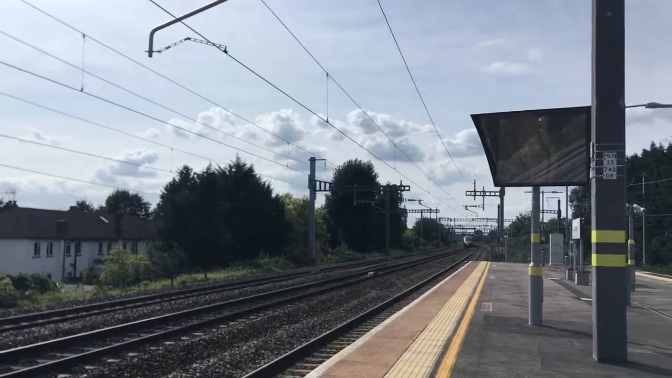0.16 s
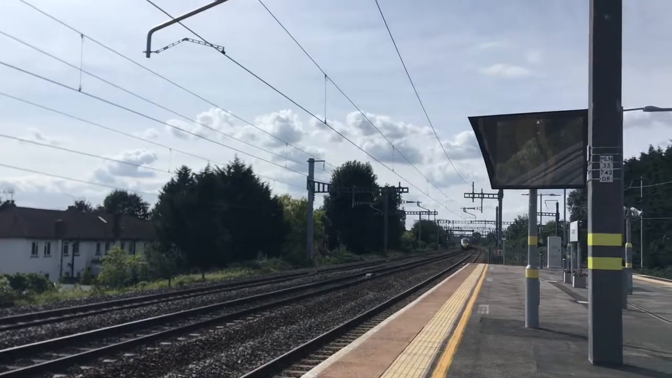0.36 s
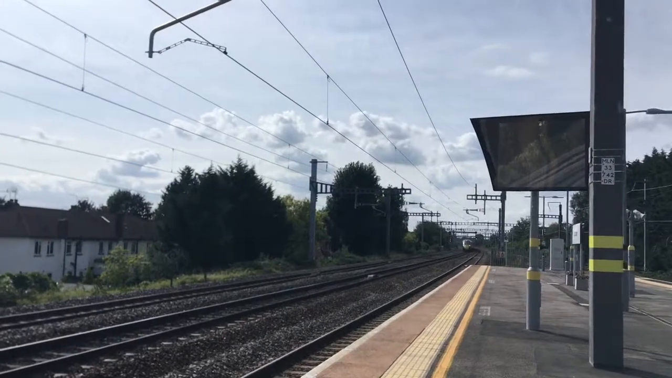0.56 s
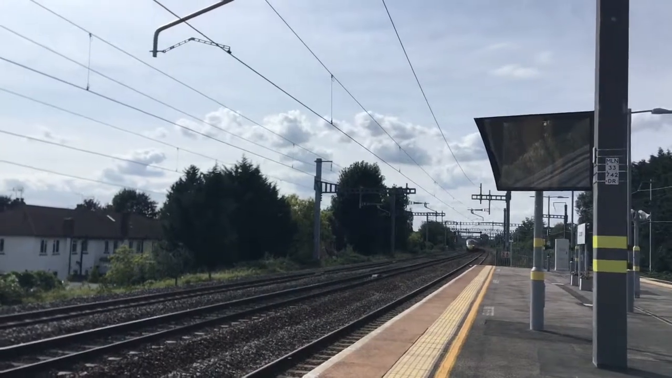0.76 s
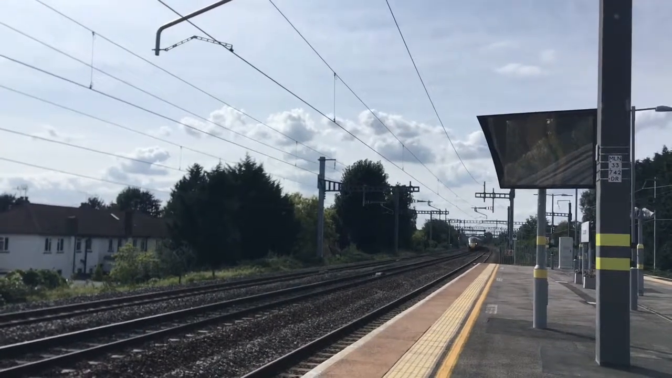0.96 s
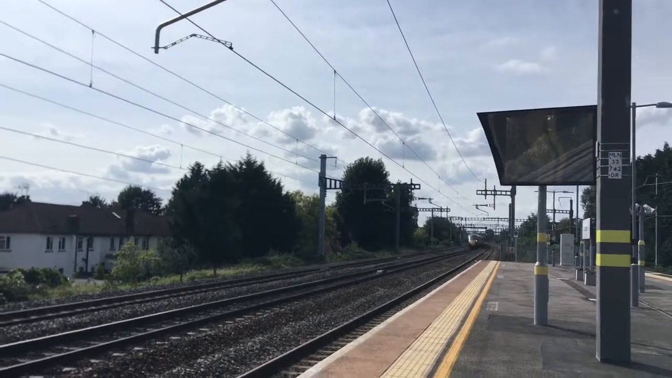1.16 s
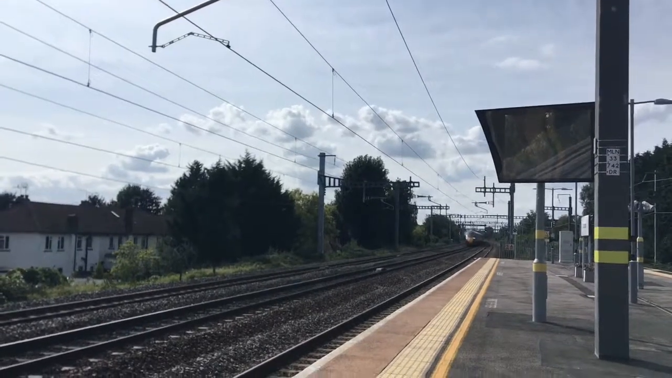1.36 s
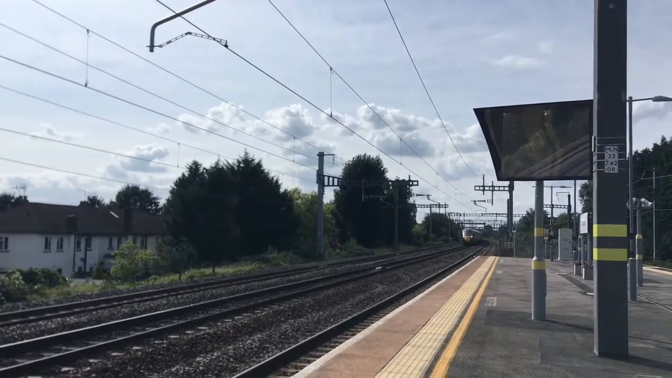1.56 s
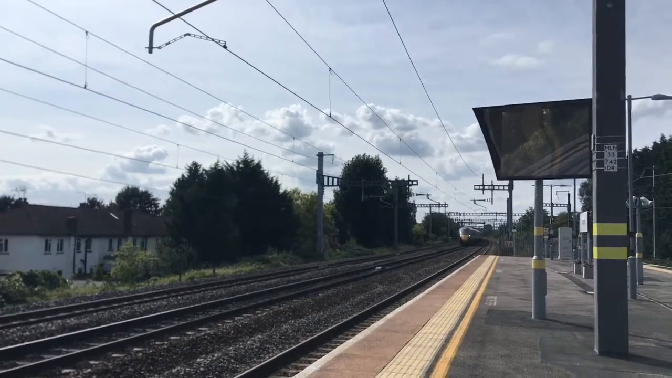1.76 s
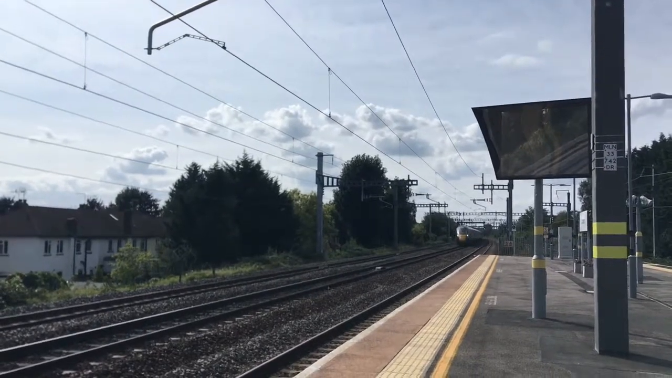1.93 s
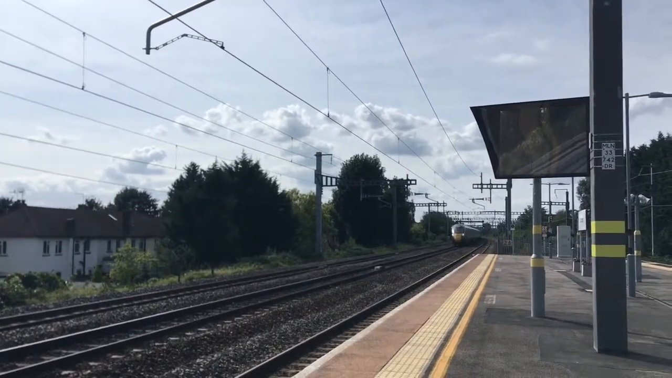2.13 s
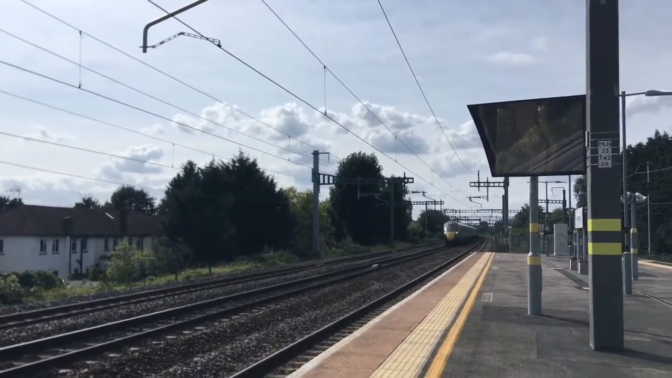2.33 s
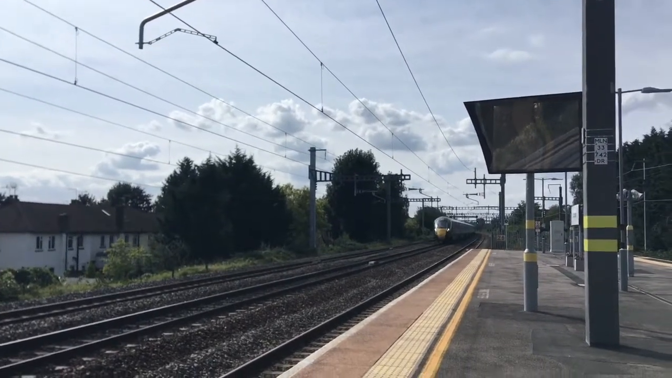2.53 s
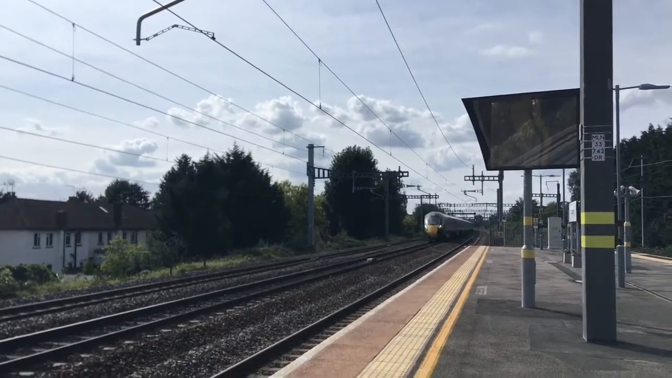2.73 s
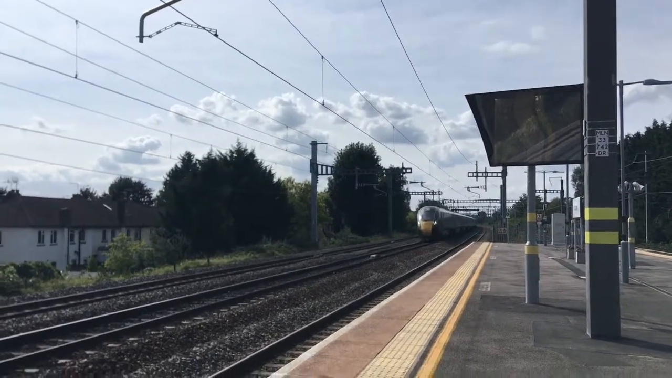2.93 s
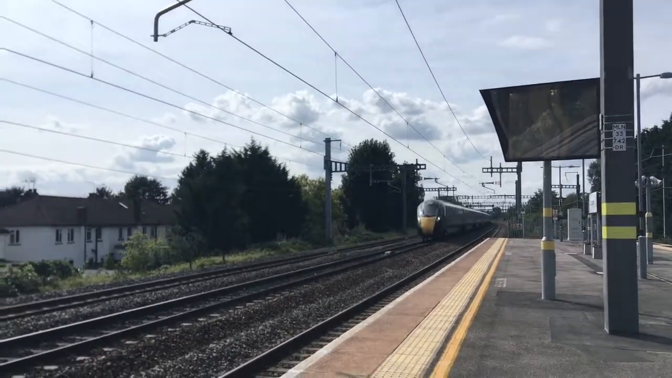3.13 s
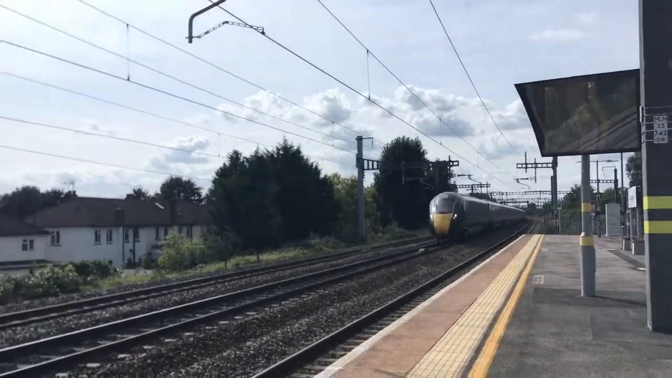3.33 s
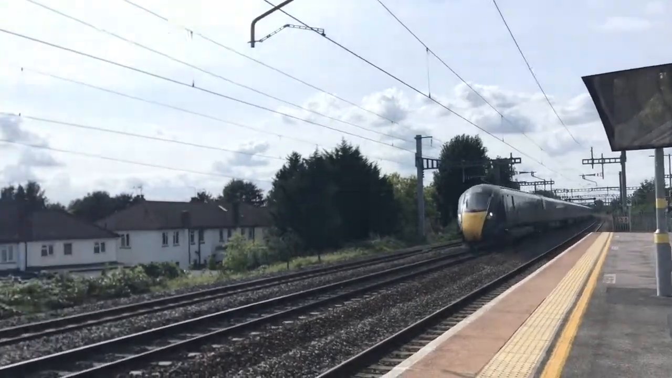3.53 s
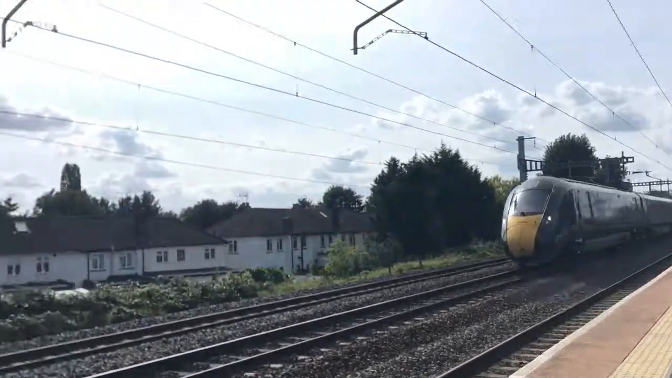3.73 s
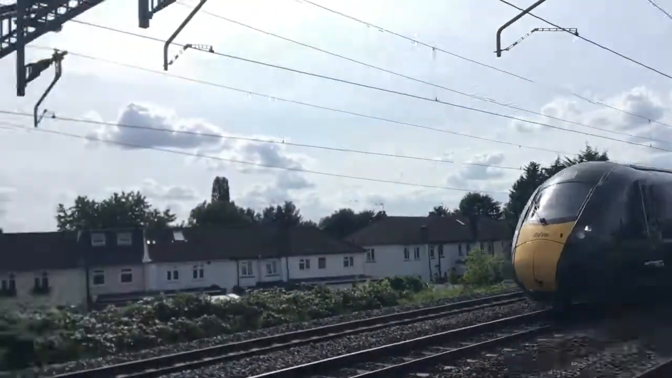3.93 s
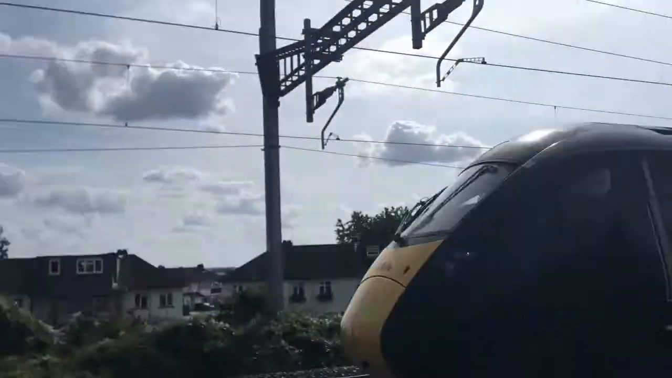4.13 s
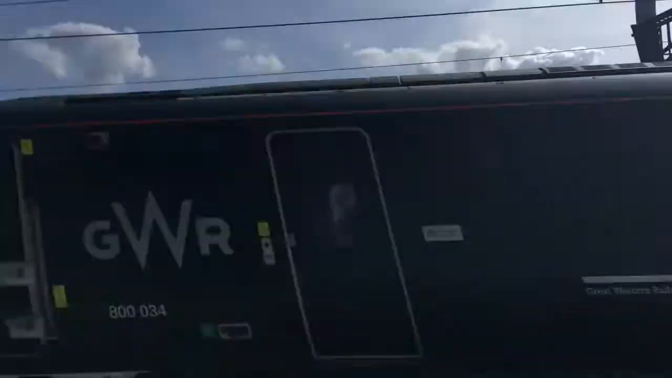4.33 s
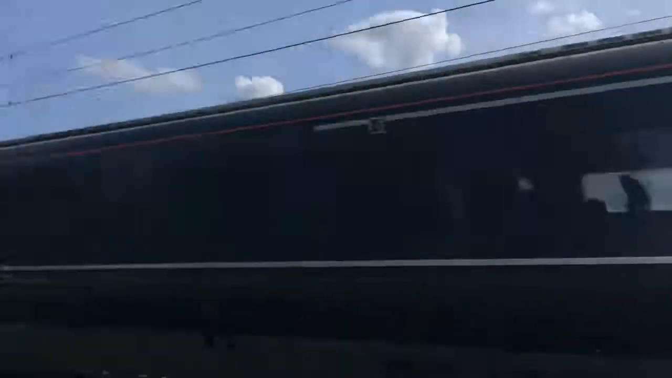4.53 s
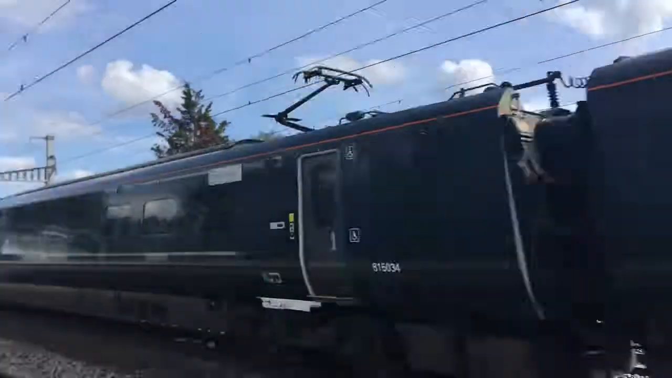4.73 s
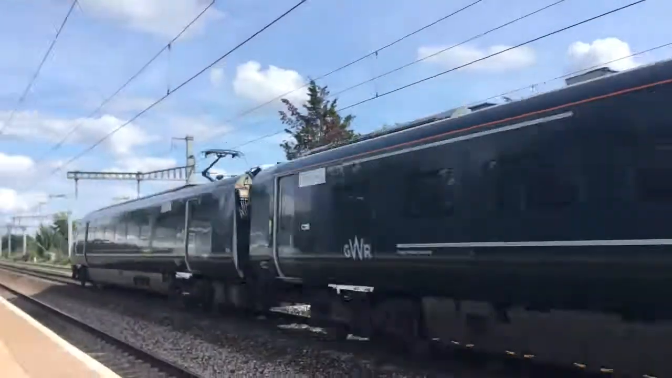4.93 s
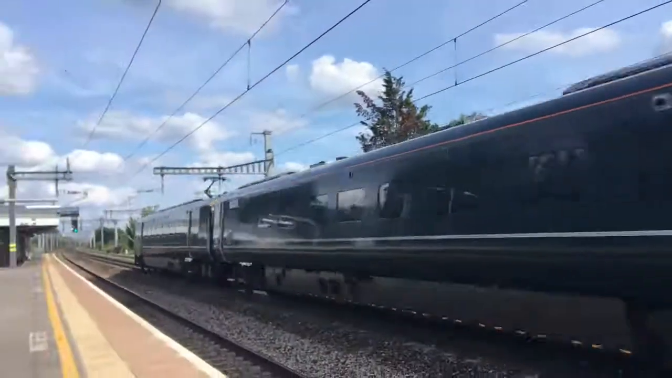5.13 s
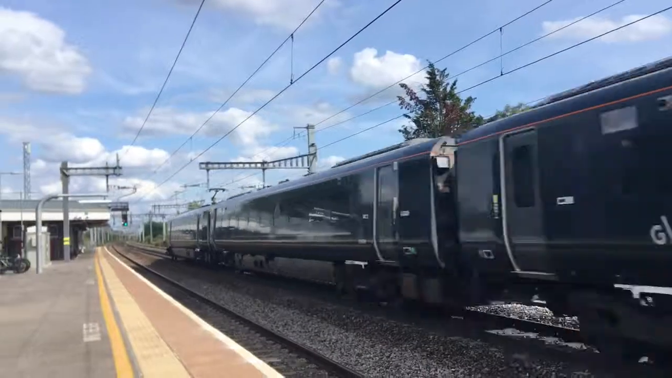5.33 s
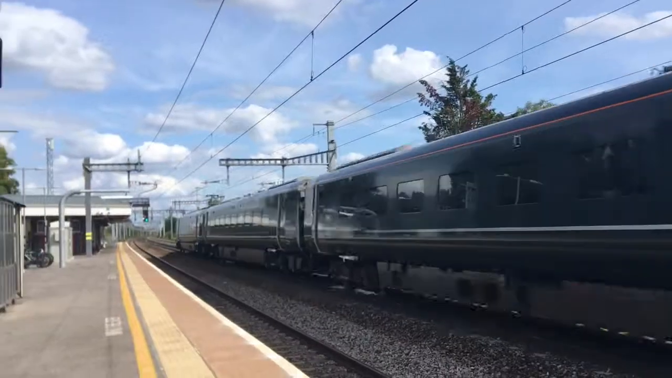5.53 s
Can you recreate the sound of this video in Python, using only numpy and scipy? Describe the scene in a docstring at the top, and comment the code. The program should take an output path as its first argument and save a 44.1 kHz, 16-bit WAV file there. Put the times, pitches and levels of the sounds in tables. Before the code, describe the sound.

At an outdoor station platform, the rails sing with a wavering tone and a thin, high hiss over faint distant traffic. An electric express approaches, its wheel roar growing louder and brighter until it rushes past close by after about four seconds, with a hiss of air, deep rumble and a low drone that drops in pitch. Wind gusts buffet the small mono microphone, which is slightly overloaded as the carriages pass.

```python
"""An electric express nears a station platform and rushes past, its wheel roar brightening as it closes in.
Rough wheels on rough rail make the roar; air and ground absorb its treble with distance.
The rails sing and hiss ahead of the train, a low drone sinks by Doppler shift, body and slipstream rumble.
Far traffic and a few faint ticks lie underneath.
Gusts and bumps strike a small mono microphone that is driven into its limiter."""
import sys
import numpy as np
from scipy import signal
from scipy.fft import rfft, irfft, next_fast_len
from scipy.io import wavfile
from scipy.ndimage import uniform_filter1d, minimum_filter1d

SR = 44100
rng = np.random.default_rng(int(sys.argv[2]) if len(sys.argv) > 2 else 0)


def materialize(psi):
    """Save the field psi as 16-bit PCM at rate SR to the path in sys.argv[1].

    A 1-D psi becomes a single channel; in a 2-D psi each row is a channel.
    """
    bounded = np.clip(np.atleast_2d(psi).T, -1, 1)
    quanta = np.round(bounded * 32767).astype(np.int16)
    wavfile.write(sys.argv[1], SR, quanta)


N = 250929
TIME_S = np.arange(N) / SR
CONTROL_S = np.arange(0, N / SR + 0.005, 0.005)   # 5 ms grid for slow gains
SPEED_M_PER_S, SOUND_M_PER_S, TRACK_M = 55, 343, 7.85


def from_db(db):
    return 10 ** (np.asarray(db) / 20)


def unit_rms(x):
    return x / np.sqrt(np.mean(x ** 2) + 1e-20)


def curves(rows):
    """Value columns of a table led by time in seconds, per sample."""
    times_s, *columns = np.transpose(rows)
    return [np.interp(TIME_S, times_s, column) for column in columns]


def per_sample(control):
    """Control grid to audio rate."""
    return np.interp(TIME_S, CONTROL_S, control)


def drift(rate_hz):
    """Slow random curve, rms 1: noise at SR / 40, twice through a one-pole low-pass."""
    pole = np.exp(-2 * np.pi * rate_hz * 40 / SR)
    slow = signal.lfilter([1], [1, -2 * pole, pole * pole], rng.standard_normal(N // 40 + 2002))[2000:]
    return np.interp(np.arange(N) / 40, np.arange(len(slow)), unit_rms(slow))


def noise_bands(spectrum, count):
    """Coloured noise of rms 1, split into overlapping bands; yields (centre in Hz, band)."""
    size = next_fast_len(N)
    octave = np.log2(np.maximum(np.arange(size // 2 + 1) * SR / size, 1))
    point_hz, point_db = np.transpose(spectrum)
    point_octave = np.log2(point_hz)
    colour = from_db(np.interp(octave, point_octave, point_db, left=-200, right=-200))
    noise = irfft(rfft(rng.standard_normal(size)) * colour, size)
    bins = rfft(unit_rms(noise))
    centres = np.linspace(point_octave[0], point_octave[-1], count)
    for k, centre in enumerate(centres):
        triangle = np.interp(octave, centres, np.arange(count) == k)
        yield 2 ** centre, irfft(bins * triangle, size)[:N]


def patchy_noise(spectrum, count, swing_db, rate_hz):
    """Coloured noise whose bands swell partly together, partly alone."""
    common = drift(rate_hz / 3)
    return sum(band * from_db(swing_db * (0.41 * common + drift(rate_hz)))
               for _, band in noise_bands(spectrum, count))


def resonance(hz, width_hz):
    """Wavering tone, rms 1: noise twice through one resonator."""
    radius = np.exp(-np.pi * width_hz / SR)
    section = [1, 0, -1, 1, -2 * radius * np.cos(2 * np.pi * hz / SR), radius * radius]
    return unit_rms(signal.sosfilt([section, section], rng.standard_normal(N + SR))[SR:])


def levelled(noise, span_s):
    """Noise with its slow loudness changes evened out, rms 1."""
    power = uniform_filter1d(noise ** 2, int(span_s * SR))
    return unit_rms(noise / np.sqrt(power + 0.022))


def pass_by_db(base_db, doubling_db, per_100m_db, gone_db, airy=False):
    """Power sum of all wheel sets on the control grid: spreading, absorption, a change once past."""
    # Wheel sets. Each row: time abreast in seconds, rolling strength in dB, air rush strength in dB.
    bogies = [(4.25, 0, 0), (4.62, -1, 0), (4.8, -7, -2.5), (5.15, -2.5, -5), (5.3, -13, -7),
              (5.58, -4, -4), (6.04, 0.5, 3), (6.5, 1, -3), (7.0, 1, -3)]
    # Swell common to all wheels. Each row: time in seconds, gain in dB.
    swell = [(0, -0.5), (0.7, -0.5), (1.8, 0), (2.45, 1), (2.9, -0.5), (3.4, -0.4), (3.8, 0.1), (4.04, -1),
             (4.2, -0.3), (4.45, 0), (4.66, -0.3), (4.85, 0.1), (4.95, -1), (5.2, 0.5), (5.45, -1),
             (5.6, 0.5)]
    abreast_s, rolling_db, rush_db = np.transpose(bogies)
    along_m = SPEED_M_PER_S * (CONTROL_S[:, None] - abreast_s)
    distance_m = np.hypot(along_m, TRACK_M)
    loss_db = doubling_db * np.log2(distance_m / TRACK_M) + per_100m_db * distance_m / 100
    gone = (1 + along_m / distance_m) / 2
    each_db = (rush_db if airy else rolling_db) - loss_db + gone_db * gone
    total_db = 10 * np.log10(np.sum(from_db(2 * each_db), axis=1))
    return base_db + np.interp(CONTROL_S, *np.transpose(swell)) + total_db


def ambience():
    """Far traffic and open air."""
    # Each row: frequency in Hz, relative density in dB.
    spectrum = [(76, -34), (130, -12), (222, -11), (315, -32), (455, 3.5), (572, -22), (599, -23), (676, 1),
                (730, 1), (764, -4), (1050, -37), (1280, -2), (1670, -20), (2230, -31), (5000, -48),
                (6500, -78), (11000, -120)]
    return from_db(-42) * patchy_noise(spectrum, count=6, swing_db=3.0, rate_hz=3.9)


def ticks_and_bumps():
    """Dry ticks nearby, dull bumps on the microphone: sines that die within two cycles."""
    # Each row of both: start in seconds, level before decay in dB, frequency in Hz.
    ticks = [(0.7294, -29, 2570), (1.0665, -28, 3300), (1.1216, -26, 3800)]
    bumps = [(0.042, -15, 330), (0.723, -20, 200), (0.953, -27, 220), (0.83, -15, 62), (1.014, -15, 66)]
    out, age_s = np.zeros(N), np.arange(SR // 20) / SR
    for start_s, level_db, hz in ticks + bumps:
        at, cycles = round(start_s * SR), hz * age_s
        out[at:at + len(age_s)] += from_db(level_db) * np.sin(2 * np.pi * cycles) * np.exp(-cycles / 0.78)
    return out


def wind_and_rumble():
    """Deep buffet on the microphone and higher rumble; breeze, train and gusts add in power."""
    # Each row: centre in seconds, buffet in dB, rumble in dB, 1/e half-width in seconds.
    gusts = [(0.015, -19, -34, 0.077), (0.426, -30, -38, 0.079), (0.549, -27, -37.5, 0.028),
             (0.75, -25, -40, 0.024), (0.855, -33, -38, 0.024), (0.96, -32, -31.5, 0.015),
             (1.02, -26, -35, .03), (1.27, -32, -35, 0.055), (1.43, -28, -45, 0.029),
             (1.757, -28, -47, 0.032), (2.796, -25, -41, 0.047), (2.97, -28, -49, 0.044),
             (3.2, -23.5, -45, 0.067), (3.477, -21, -28.5, 0.026), (3.706, -16.5, -26, 0.029),
             (3.834, -18, -25, 0.045), (3.97, -20, -22.5, 0.073), (4.137, -15.5, -23.5, .04),
             (4.307, -28, -12, 0.038), (4.4, -14, -38, .05), (4.605, -17, -19, 0.054),
             (4.86, -15, -28, 0.043), (5.103, -21, -31, 0.026), (5.36, -25, -23.5, 0.034),
             (5.57, -20, -24, 0.058)]
    # Each row of both: frequency in Hz, relative density in dB.
    rumble_spectrum = [(53, -19), (90, 4.5), (129, -0.5), (178, 0.5), (210, 3.5), (247, -5.5), (450, -11),
                       (580, -9.5), (990, -120)]
    buffet_spectrum = [(13, -45), (22, -37), (29, 0.5), (40, -7.5), (59, 3), (76, -4), (118, -18),
                       (130, -20), (170, -16), (290, -120)]
    breeze_buffet_db, breeze_rumble_db = -39.5, -42
    slipstream_db = pass_by_db(-21, doubling_db=5.5, per_100m_db=-2, gone_db=-1.5)
    body_db = pass_by_db(-19.5, doubling_db=5.5, per_100m_db=2.8, gone_db=-4)
    centre_s, buffet_db, rumble_db, width_s = np.transpose(gusts)
    bells = np.exp(-((CONTROL_S[:, None] - centre_s) / width_s) ** 2)
    rumble_power = from_db(2 * breeze_rumble_db) + from_db(2 * body_db) + bells @ from_db(2 * rumble_db)
    buffet_power = from_db(2 * breeze_buffet_db) + from_db(2 * slipstream_db)
    buffet_power += bells @ from_db(2 * buffet_db)
    rumble = levelled(patchy_noise(rumble_spectrum, count=4, swing_db=-1.1, rate_hz=9.9), span_s=0.04)
    buffet = levelled(patchy_noise(buffet_spectrum, count=3, swing_db=1.5, rate_hz=5.2), span_s=0.044)
    return per_sample(np.sqrt(rumble_power)) * rumble + per_sample(np.sqrt(buffet_power)) * buffet


def air_rush():
    """Hiss of air as each wheel set passes."""
    # Each row: frequency in Hz, relative density in dB.
    spectrum = [(2760, -45), (4700, -3), (4920, -1.5), (5840, 1), (7600, -6.5), (9880, -24), (16700, -120)]
    level_db = per_sample(pass_by_db(-27, doubling_db=6.5, per_100m_db=8.5, gone_db=-1.5, airy=True))
    return from_db(level_db) * patchy_noise(spectrum, count=3, swing_db=0.5, rate_hz=8.6)


def drone(rest_hz=194.2, waver_hz=8.26, abreast_s=4.65, nearest_m=18):
    """Low wavering sine; Doppler shift lowers it as its source goes by."""
    # Each row: time in seconds, level in dB.
    swells = [(1.9, -56), (2.05, -33), (2.38, -48), (2.5, -37.5), (3.04, -28.5), (3.13, -36), (3.27, -27.5),
              (3.32, -37), (3.61, -24), (3.85, -36), (3.94, -23.5), (4.15, -35), (4.32, -19), (4.37, -28),
              (4.45, -14.5), (4.52, -14), (4.57, -26), (4.61, -16), (4.68, -22), (4.85, -31), (5.05, -60)]
    along_m = SPEED_M_PER_S * (TIME_S - abreast_s)
    receding_m_per_s = SPEED_M_PER_S * along_m / np.hypot(along_m, nearest_m)
    hz = rest_hz / (1 + receding_m_per_s / SOUND_M_PER_S) + waver_hz * drift(25.2)
    return from_db(curves(swells)[0]) * np.sin(2 * np.pi * np.cumsum(hz) / SR)


def rail_hiss(edge_hz=11800):
    """High rail hiss in three bands; narrow resonances give way to plain hiss as the train nears."""
    # Each row of all four: frequency in Hz, relative density in dB.
    far_top_spectrum = [(10300, -40), (10700, -8), (11100, -8.5), (11400, 0.5), (12000, -1), (13400, 3.5),
                        (14200, 1), (15300, -3), (15700, -4), (16000, -30)]
    near_top_spectrum = [(6180, -18), (10500, -10), (11300, -2), (12600, 0), (14900, -4), (15600, -5)]
    middle_spectrum = [(4350, -23), (7400, -11), (9120, 2.5), (10600, -4.5), (13800, -28), (22000, -120)]
    low_spectrum = [(6300, -28), (6600, -1), (6900, -3), (7200, -4), (7350, -30)]
    # Each row: frequency in Hz, width in Hz, level in dB relative to the far top band.
    rail_modes = [(8500, 30, -38), (9640, 120, -24), (9780, 120, -24), (11200, 90, -20), (12200, 110, -17),
                  (12600, 40, -12.5), (13650, 60, -23), (14330, 60, -20), (14620, 50, -26),
                  (15000, 60, -33), (15640, 80, -14)]
    # Top band. Each row: time in seconds, gain in dB, extra gain below edge_hz in dB.
    top_gains = [(0, -53.5, -8), (0.75, -48.5, -4.5), (1.4, -45, -7), (1.9, -43.5, -1.5),
                 (2.04, -45.5, -1.5), (2.4, -41, -0.5), (2.56, -44, 1), (2.8, -40.5, 2), (3.3, -40, 3),
                 (3.6, -34.5, 3.5), (3.82, -29.5, 3), (4.0, -31, 4), (4.22, -24, -0.5), (4.48, -28.5, 0.3),
                 (4.66, -27.5, 1), (4.95, -30.5, 1.5), (5.14, -29, 0.3), (5.5, -30.5, 1), (5.69, -29, 0.3)]
    top_db, shelf_db = curves(top_gains)
    middle_db = per_sample(pass_by_db(-29, doubling_db=3.5, per_100m_db=15.5, gone_db=-1))
    low_db = per_sample(pass_by_db(-38, doubling_db=5.5, per_100m_db=4, gone_db=-4))
    nearness = np.clip((middle_db + 43.5) / 12, 0, 1)
    modes = sum(from_db(db + 1.7 * drift(2.7)) * resonance(hz, width) for hz, width, db in rail_modes)
    far_top = patchy_noise(far_top_spectrum, count=5, swing_db=1.05, rate_hz=12) + modes
    near_top = patchy_noise(near_top_spectrum, count=4, swing_db=0.74, rate_hz=18)
    top = np.sqrt(1 - nearness) * far_top + np.sqrt(nearness) * near_top
    below_edge = signal.sosfiltfilt(signal.butter(4, edge_hz, fs=SR, output="sos"), top)
    top += (from_db(shelf_db) - 1) * below_edge
    middle = patchy_noise(middle_spectrum, count=4, swing_db=0.45, rate_hz=24)
    low = np.sqrt(1 - nearness) * patchy_noise(low_spectrum, count=2, swing_db=1.3, rate_hz=18)
    return from_db(top_db) * top + from_db(middle_db) * middle + from_db(low_db) * low


def rail_song(tone_hz=724):
    """A rail tone roughens and fades as the wheels arrive; rail and wheel resonances swell in turn."""
    # Main tone. Each row: time in seconds, level before the fade in dB.
    swells = [(0.0, -45), (0.3, -53), (0.5, -41.5), (0.72, -36.5), (0.88, -39.5), (1.13, -30), (1.31, -42),
              (1.4, -32.5), (1.55, -32.5), (1.64, -49), (1.85, -32), (2.3, -30), (2.5, -35.5), (2.56, -28),
              (2.98, -30.5), (3.05, -48), (3.12, -29), (3.42, -29), (3.6, -24.5), (3.74, -21), (4.1, -32)]
    # Each row: frequency in Hz, width in Hz, top level in dB, peak time and 1/e half-width in seconds.
    modes = [(1127, 13, -43, 2.63, 2.2), (1234, 25, -42.5, 3.7, 3), (1301, 24, -45.5, 2.1, 1.3),
             (457, 59, -48, 0.44, 0.25), (230, 51, -38.5, 1.07, 0.57), (538.4, 31, -45, 2.83, 0.99),
             (516.7, 17.5, -29.5, 3.84, 0.49), (642.6, 40, -35, 3.44, 1.04), (2230, 910, -21.5, 4.24, 0.14),
             (2100, 330, -21.5, 4.7, .12), (1040, 250, -32, 5.4, 0.33), (1386, 2.8, -37, 5, 1.6),
             (590, 69, -26.5, 4.99, 0.38)]
    waver_hz = np.interp(TIME_S, [2.9, 3.4], [2.5, 9]) * drift(16.6)
    fade = np.interp(TIME_S, [3.3, 4.0], [1, 0])
    out = from_db(curves(swells)[0]) * fade * np.sin(2 * np.pi * np.cumsum(tone_hz + waver_hz) / SR)
    for hz, width_hz, level_db, peak_s, width_s in modes:
        bell = per_sample(np.exp(-((CONTROL_S - peak_s) / width_s) ** 2))
        out += from_db(level_db) * bell * resonance(hz, width_hz)
    return out


def wheel_roar():
    """Rough wheel on rough rail; air and ground take more treble the farther the train."""
    # Roar close by. Each row: frequency in Hz, relative density in dB.
    spectrum = [(150, -50), (250, -3), (467, -7), (601, 1), (764, -3.5), (1040, -3.5), (1470, -6.5),
                (2130, -7), (4790, -19.5), (6000, -25.5), (7800, -37), (13200, -120)]
    low_db = pass_by_db(-15, doubling_db=5, per_100m_db=2.5, gone_db=-1)
    middle_db = pass_by_db(-13.5, doubling_db=5.5, per_100m_db=1.5, gone_db=2)
    high_db = pass_by_db(-15.5, doubling_db=5.5, per_100m_db=4, gone_db=2.5)
    out, common = np.zeros(N), drift(20)
    for hz, band in noise_bands(spectrum, count=14):
        high_weight = np.clip(np.log2(hz / 1500) / 1.14, 0, 1.6)
        low_weight = np.clip(np.log2(850 / hz) / 0.43, 0, 1)
        level_db = middle_db + high_weight * (high_db - middle_db) + low_weight * (low_db - middle_db)
        flicker_db = 0.71 * (1.1 * common + drift(39))
        out += band * from_db(per_sample(level_db) + flicker_db)
    return out


def scene():
    """All sources at one microphone port; both channels alike."""
    air = wind_and_rumble() + air_rush() + ambience()
    train = wheel_roar() + rail_hiss() + rail_song() + drone()
    return np.tile(air + train + ticks_and_bumps(), (2, 1))


def record(dry):
    """The capsule loses deep bass, its port dips near 5 kHz, a limiter holds peaks, the top is cut."""
    low_cut_hz, high_cut_hz, ceiling = 38.5, 15880, 0.96
    dip_hz, dip_width_hz, dip_depth = 4900, 680, 0.41
    capsule = signal.sosfilt(signal.butter(4, low_cut_hz, "high", fs=SR, output="sos"), dry[0])
    port = signal.lfilter(*signal.iirpeak(dip_hz, dip_hz / dip_width_hz, fs=SR), capsule)
    heard = capsule - dip_depth * port
    allowed_gain = ceiling / np.maximum(np.abs(heard), ceiling)
    gain = uniform_filter1d(minimum_filter1d(allowed_gain, size=132), size=132)   # 3 ms windows
    high_cut = signal.cheby2(30, 60, high_cut_hz, fs=SR, output="sos")
    return np.tile(signal.sosfilt(high_cut, gain * heard), (2, 1))


dry = scene()
out = record(dry)
materialize(out)
```